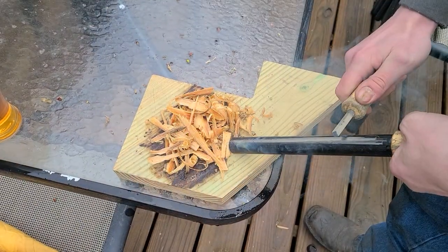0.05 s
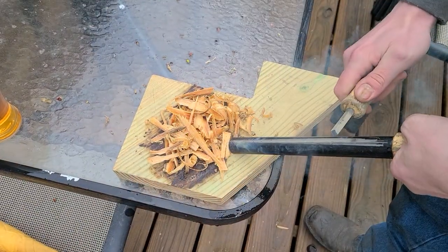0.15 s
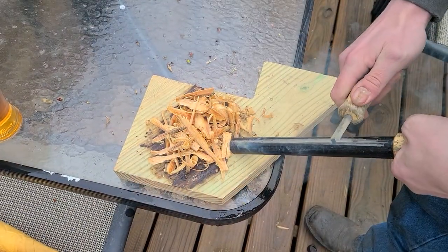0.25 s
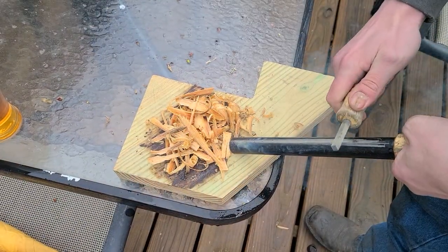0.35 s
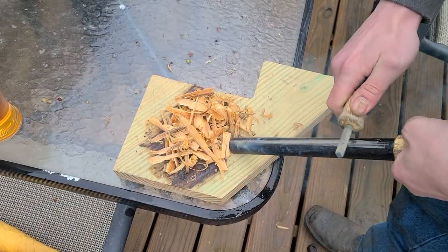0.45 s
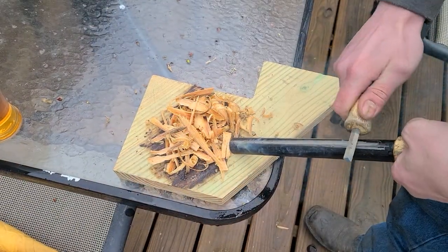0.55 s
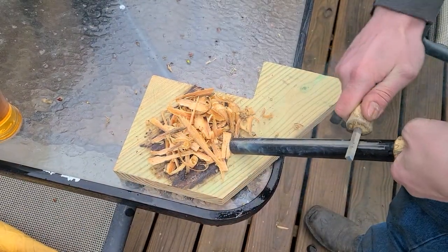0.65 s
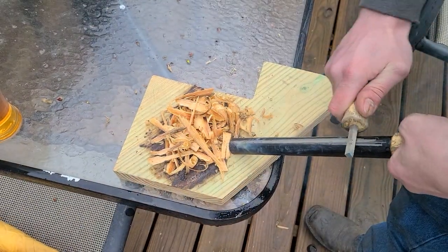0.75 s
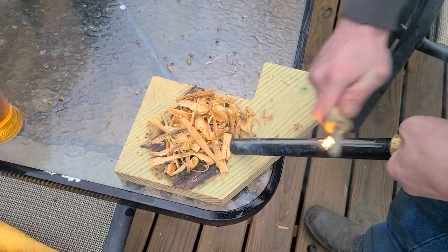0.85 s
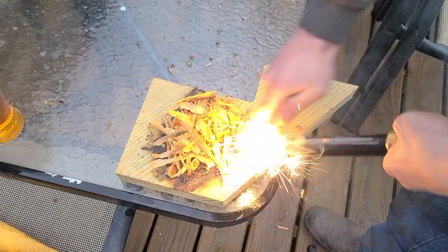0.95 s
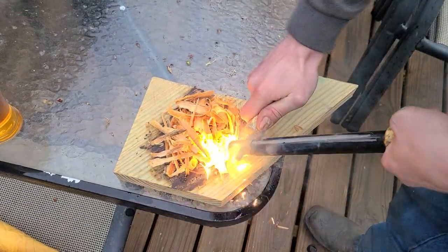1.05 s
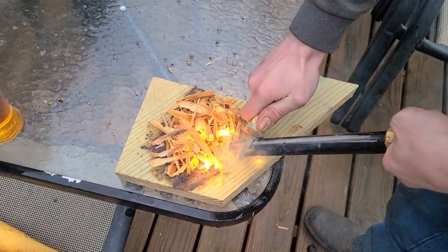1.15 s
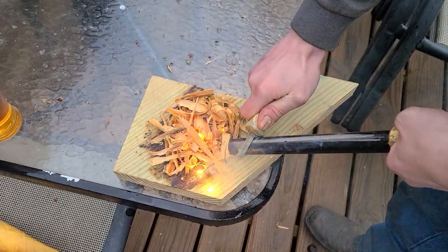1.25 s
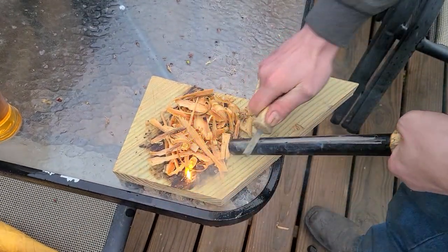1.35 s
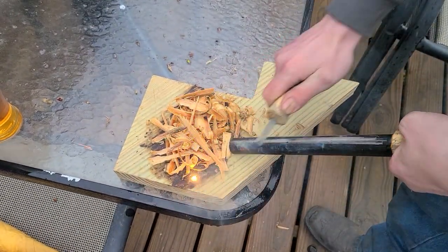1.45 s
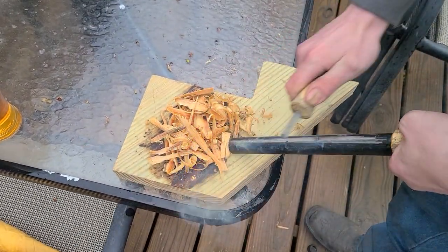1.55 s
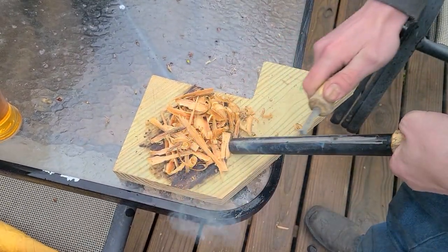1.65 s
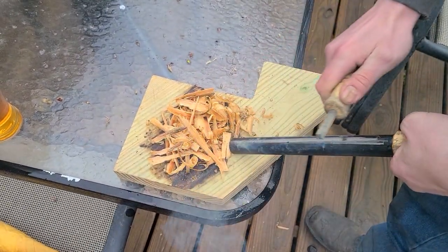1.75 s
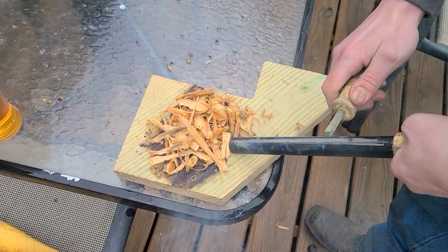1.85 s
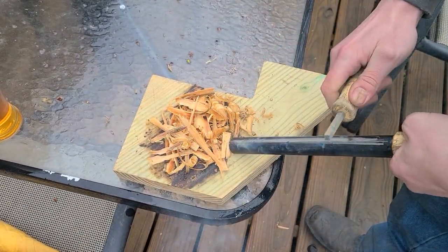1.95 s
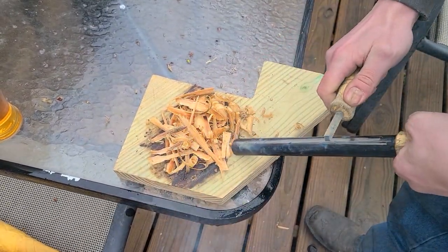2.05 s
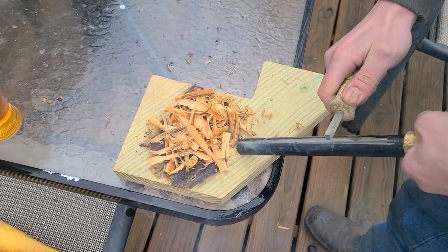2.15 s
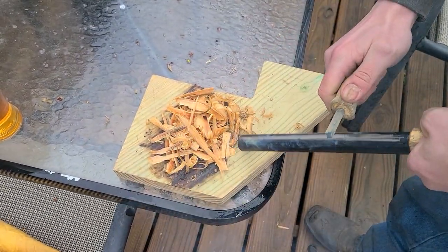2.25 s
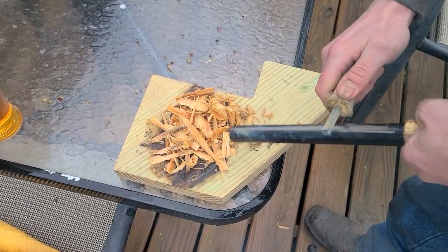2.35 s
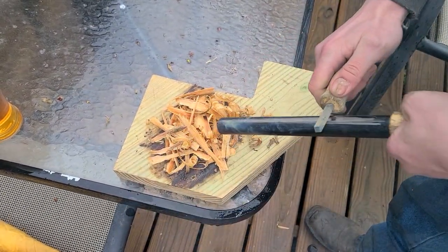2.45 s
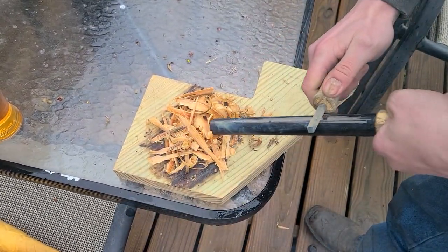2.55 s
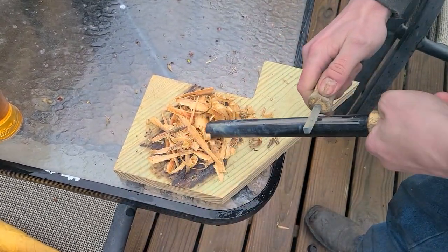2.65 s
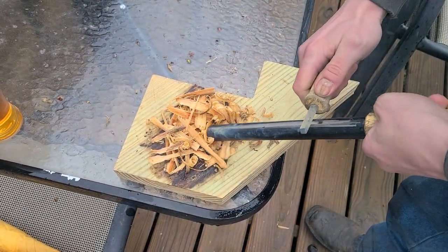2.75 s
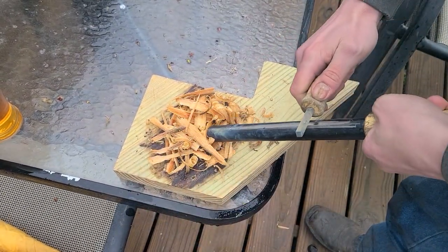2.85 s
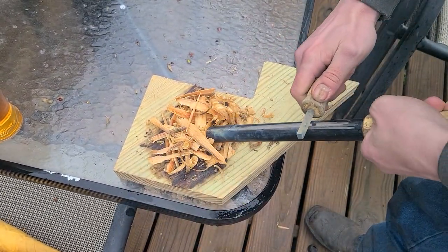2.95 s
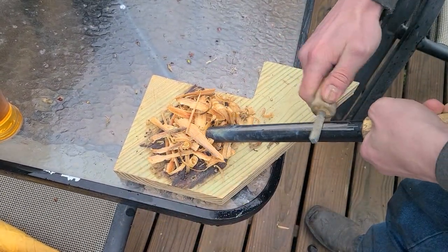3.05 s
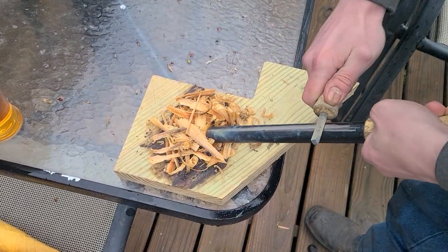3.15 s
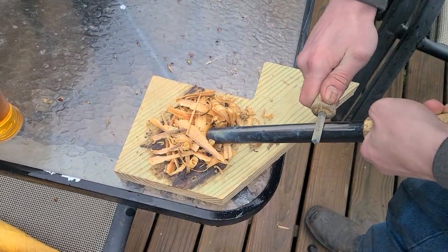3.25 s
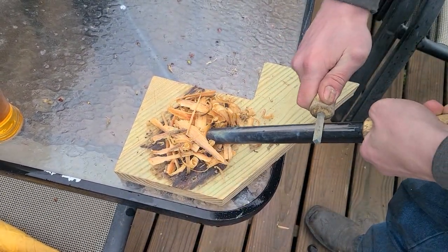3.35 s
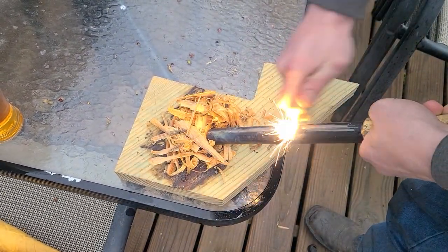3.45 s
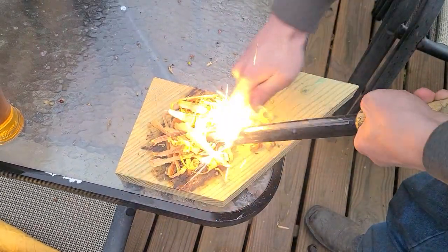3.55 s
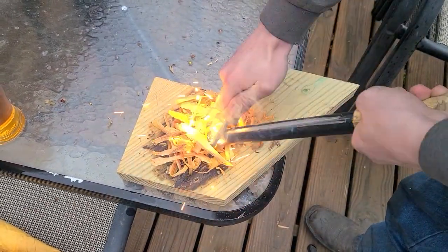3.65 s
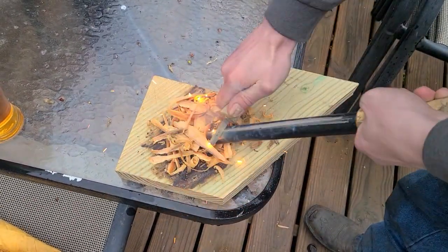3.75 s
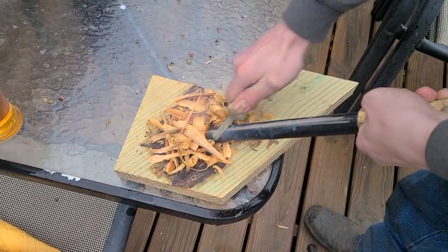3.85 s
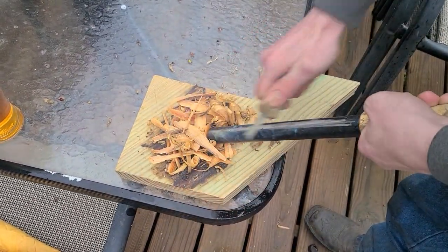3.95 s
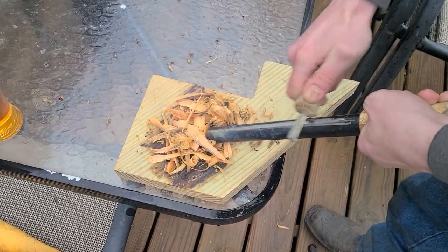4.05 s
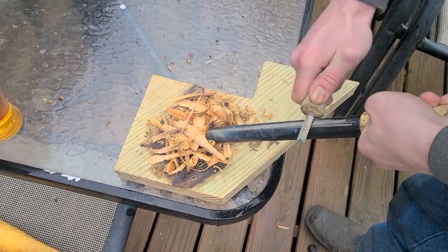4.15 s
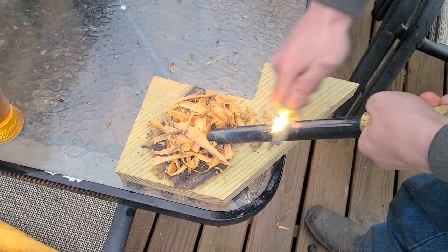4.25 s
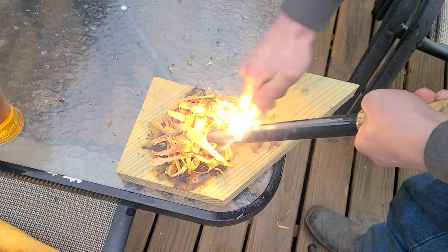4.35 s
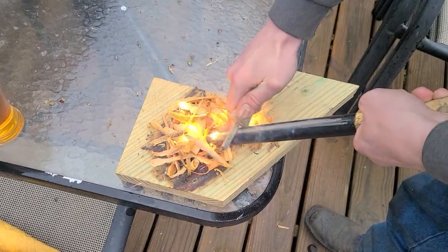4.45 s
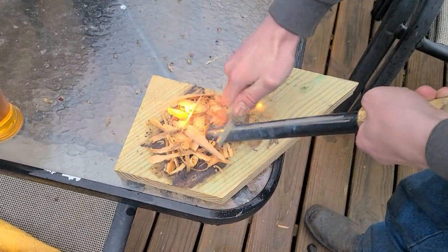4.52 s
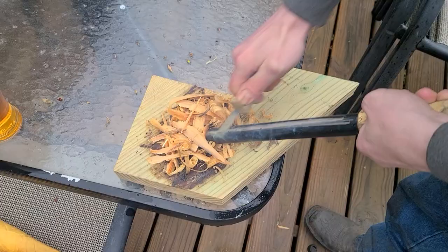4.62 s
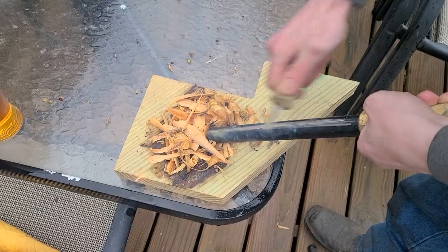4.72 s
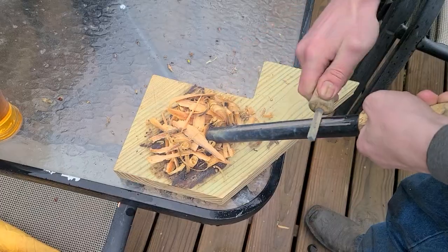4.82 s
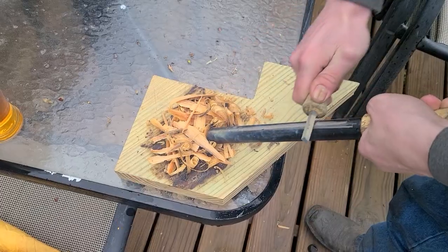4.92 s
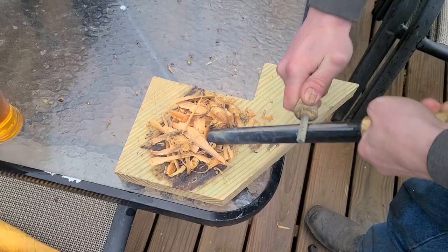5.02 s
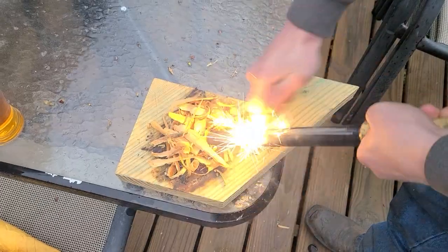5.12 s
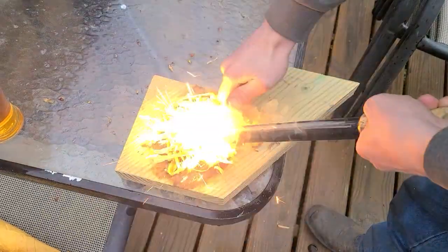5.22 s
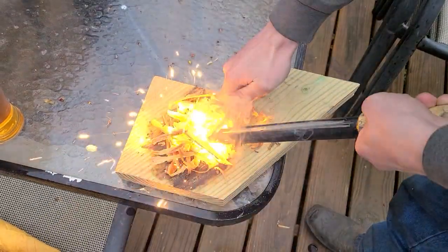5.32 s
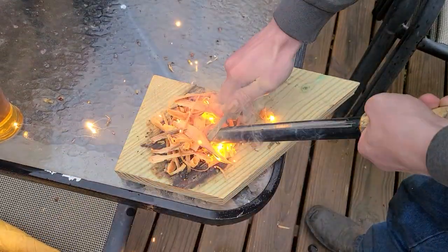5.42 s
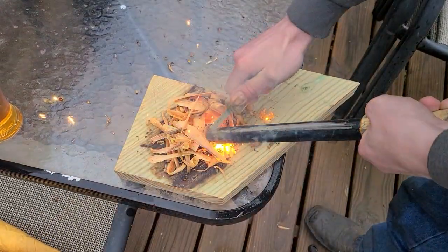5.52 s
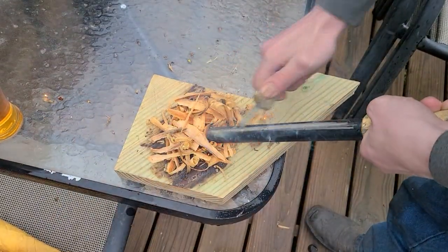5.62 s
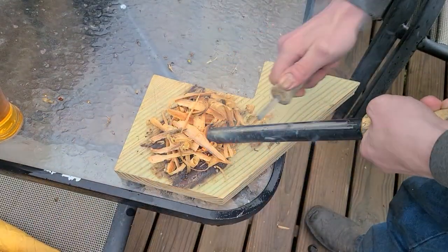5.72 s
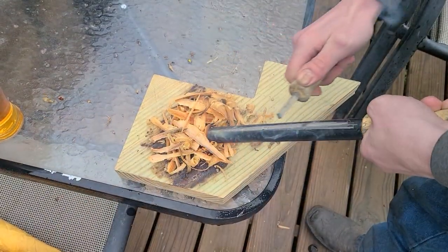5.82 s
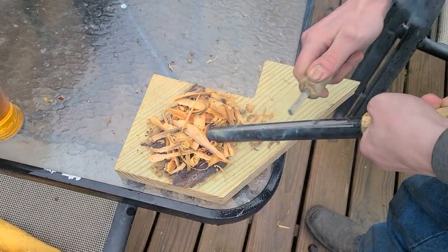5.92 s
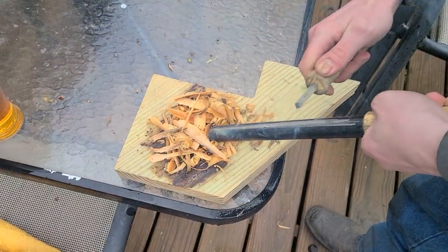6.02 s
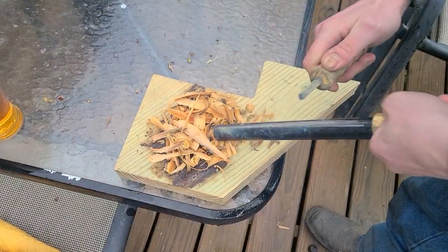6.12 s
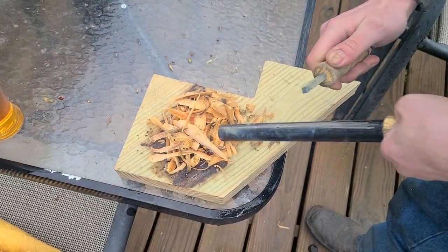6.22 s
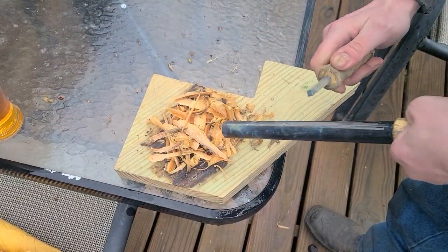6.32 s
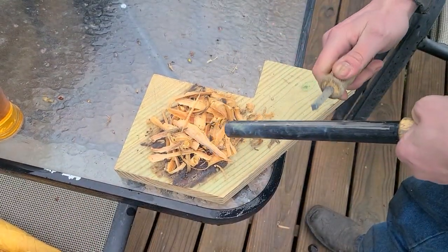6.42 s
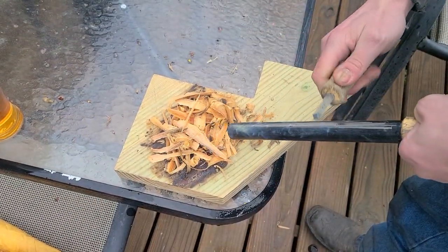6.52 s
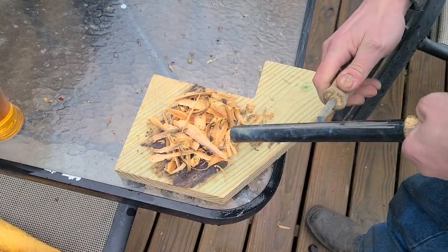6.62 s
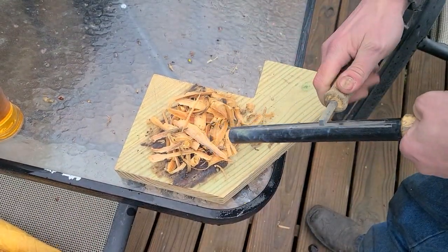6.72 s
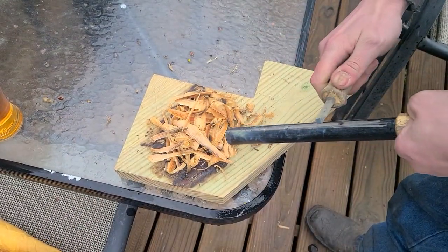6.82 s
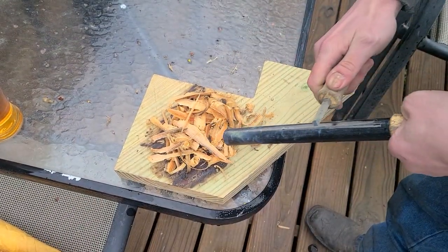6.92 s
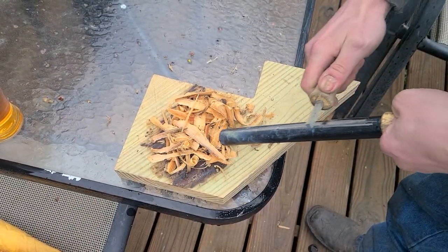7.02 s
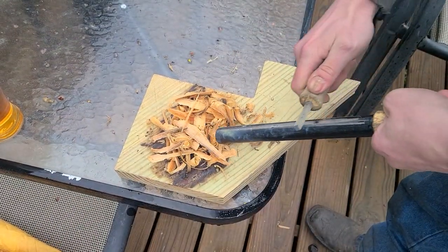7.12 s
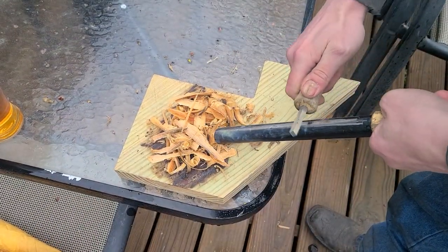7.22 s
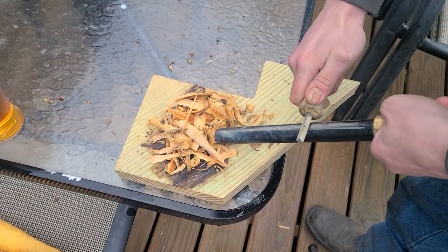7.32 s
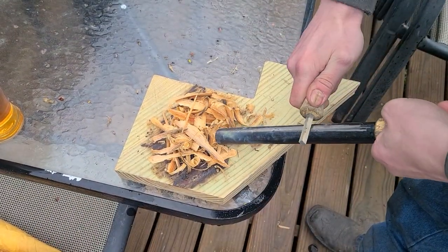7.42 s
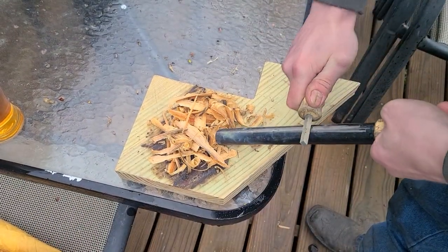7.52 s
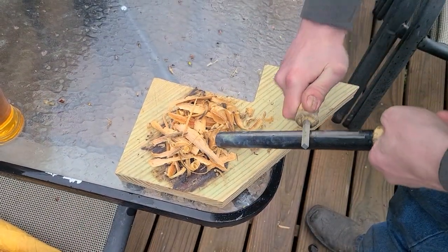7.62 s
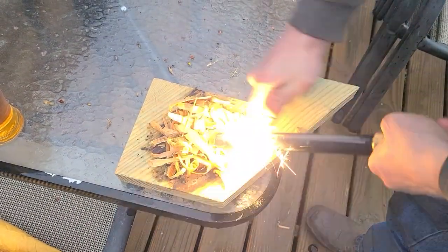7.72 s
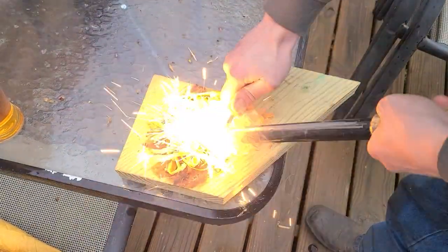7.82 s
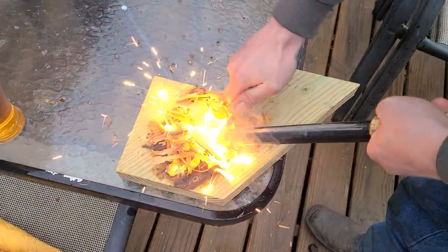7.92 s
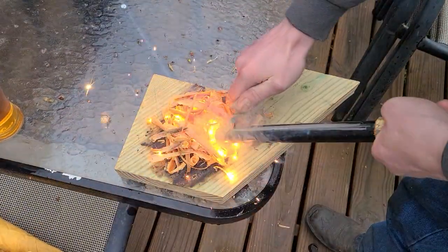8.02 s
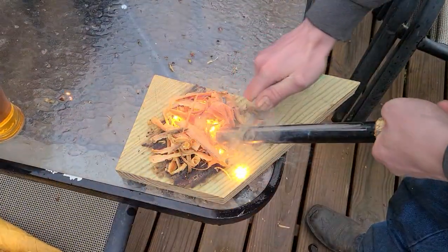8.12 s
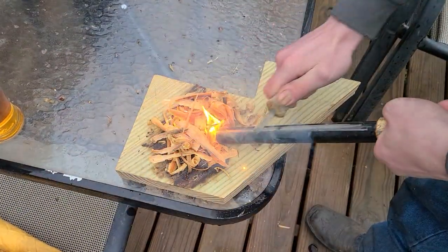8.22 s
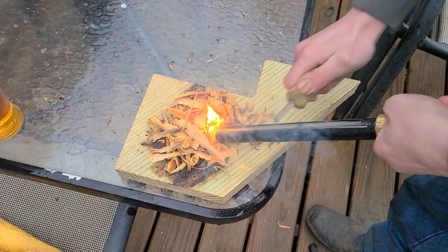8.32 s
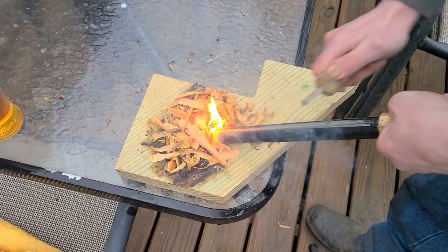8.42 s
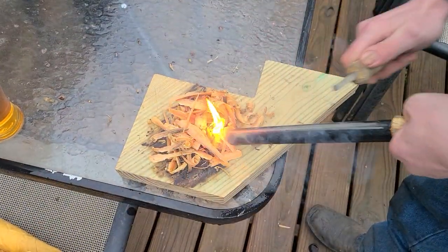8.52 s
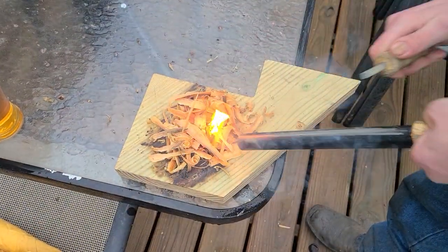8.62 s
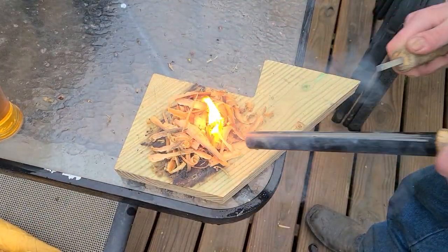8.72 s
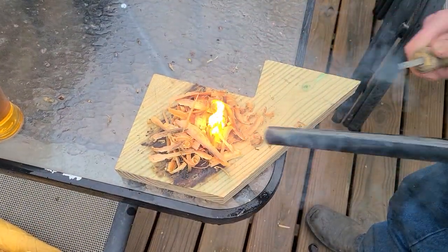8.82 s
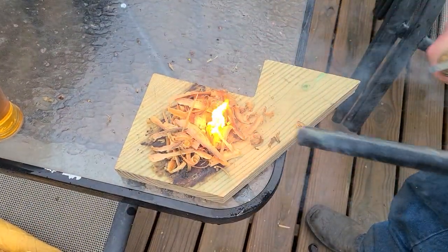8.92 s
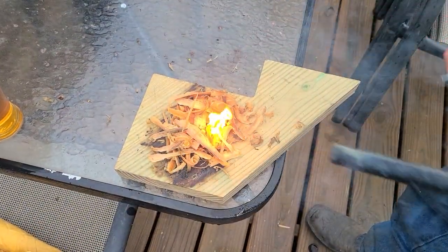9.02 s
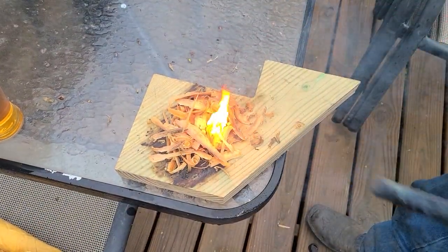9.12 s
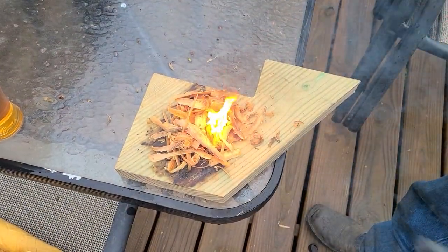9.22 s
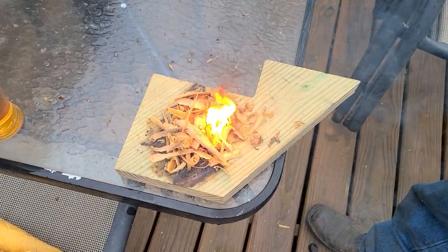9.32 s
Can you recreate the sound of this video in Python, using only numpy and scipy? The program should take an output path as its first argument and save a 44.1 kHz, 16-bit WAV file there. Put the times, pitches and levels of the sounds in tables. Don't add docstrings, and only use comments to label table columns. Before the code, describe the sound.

Outdoors, a songbird already under way repeats sharp chips and a falling, levelling whistle until about 0.9 s, with long echoes off houses. Low traffic rumble, tyre wash, a wavering far engine and a faint fan hum lie behind throughout. Close and mostly right, a light metal touch at 0.6 s leads to a harsh gritty rasp at 0.9-1.2 s, ending in woody knocks. A hard ringing tap comes at 3.2 s, a fast scrape at 3.5-3.7, the loudest tap at 4.2, a short scrape at 4.3-4.5, another tap at 4.9 and the hardest scrape at 5.15-5.4. Between them are small rustles, slips and dry spark spits. The bird returns from 5.9 to about 8.1 s. After a clear tap at 7.4, the last scrape tears at 7.8-8.0, juddering on the board. Then very faint fire ticks and soft wooden bumps end it near 9.3 s.

```python
import sys
import numpy as np
from scipy import signal
from scipy.fft import rfft, irfft, next_fast_len
from scipy.io import wavfile
from scipy.ndimage import uniform_filter1d, map_coordinates

SR = 44100
rng = np.random.default_rng(int(sys.argv[2]) if len(sys.argv) > 2 else 0)


def generate_wav(sig):
    pcm = np.round(np.clip(np.atleast_2d(sig).T, -1, 1) * 32767).astype(np.int16)
    wavfile.write(sys.argv[1], SR, pcm)


def gain_from_db(level_db):
    decades = np.asarray(level_db, float) / 20
    return 10 ** decades


N = 413216

# (time [s], speed [dB], pressure on the board [dB])
STROKES = [
    [(0.91, -78, 10), (0.932, -50.5, -5), (0.984, -38.5, -1.5), (1.06, -32.5, -3.5), (1.13, -44.5, 2),
     (1.17, -58, 25.5), (1.27, -73, 27.5)],
    [(3.5, -86, 11), (3.528, -50.5, 2), (3.56, -37.5, -4.5), (3.662, -34.5, -11), (3.684, -38, 1.5),
     (3.725, -41.5, -4), (3.79, -75.5, 28)],
    [(4.3, -71, 5), (4.35, -38.5, -6.5), (4.44, -40.5, -6), (4.474, -39, -5), (4.52, -45, 1.5),
     (4.55, -69, 17.5), (4.57, -56, 17)],
    [(5.14, -84, 8), (5.168, -37.5, -2.5), (5.25, -33.5, -3), (5.278, -26.5, -4), (5.33, -40.5, 6),
     (5.385, -58, 6.5), (5.43, -60, 14)],
    [(7.77, -55.5, -19), (7.792, -39, 7), (7.826, -28.5, -0.5), (7.878, -30.5, 8), (7.922, -44, 2.5),
     (7.95, -44.5, 1.5), (7.99, -60.5, 6)],
]
# (peak time [s], level [dB], rise [dB/s], fall [dB/s])
SHOVES = [
    (1.085, -38, 400, 402),
    (3.678, -30, 900, 500),
    (3.712, -29, 300, 400),
    (4.5, -33.5, 400, 404),
    (5.285, -28, 142, 601),
    (7.87, -37, 206, 503),
]
# (frequency [Hz], level [dB per Hz])
GRIT_COLOUR = [(2940, -27.5), (5000, -6), (6590, 0.5), (8020, -7), (9380, -16), (11100, -10), (13300, -8),
               (15200, -17)]
# (frequency [Hz], width [Hz], level [dB])
BLADE_MODES = [(3130, 2050, 2.5), (4660, 360, 4), (4860, 260, -10), (5860, 160, 4.5)]
ROD_MODES = [(720, 72, -2.5), (1280, 500, -2.5), (1667, 130, 0), (1860, 156, -4), (2790, 370, -12.5)]
BOARD_MODES = [(168.2, 28, 7.5), (225, 250, -3.5), (381, 86, 2), (440, 107, -3.5)]
# (frequency [Hz], left-right likeness [-1..1])
NEAR_ALIKE = [(60, 0.95), (180, 0.91), (550, 0.3), (1650, 0.64), (4970, 0.13), (15000, -0.063)]
# (frequency [Hz], left over right [dB])
NEAR_PAN = [(60, 2), (150, 3.5), (380, -25), (950, 7.5), (2380, -8), (5980, -8), (15000, -9.5)]


def strokes():
    speed, pressure = levels(STROKES)
    gone, edge_s = travel(), 0.0077
    speed = speed * np.clip(np.minimum(gone, 1 - gone) * 0.7 / edge_s, 0, 1)
    grit = gain_from_db(-0.5) * speed
    blade = gain_from_db(-1) * speed * pressure ** 0.29
    rod = gain_from_db(-2.5) * speed * pressure ** 0.7
    board = gain_from_db(-0.5) * speed * pressure
    bite = gain_from_db(0.7 * wobble(30) + 1.2 * wobble(180))

    def near(pair, response):
        uneven = patched(pair, depth_db=1.5, bins=3, frames=12)
        return bite * stereo(uneven, response, NEAR_ALIKE, NEAR_PAN)

    def darker(table):
        ring = modes(table)
        return lambda hz: ring(hz) * np.abs(ring(hz)) ** 0.1

    slips = np.diff(np.floor(np.cumsum(125 * gain_from_db(2.5 * wobble(25)) / SR)), prepend=0)
    judder = slips * gain_from_db(2.3 * rng.standard_normal(N)) + 0.055 * rng.standard_normal((2, N))
    board_alike, board_pan = [(150, 1.0), (600, 0.81)], [(150, -1.26), (500, -5.0)]

    sound = grit * near(grains(9000, spread_db=1.5), colour(GRIT_COLOUR))
    sound += blade * near(grains(4000, spread_db=0.0), darker(BLADE_MODES))
    sound += rod * near(grains(3000, spread_db=1.0), darker(ROD_MODES))
    sound += board * bite * stereo(judder, darker(BOARD_MODES[1:]), board_alike, board_pan)
    shove_hz = BOARD_MODES[0][0] * gain_from_db(0.34 + 0.6 * wobble(30))
    hum = np.sqrt(2) * np.sin(2 * np.pi * np.cumsum(shove_hz) / SR)
    return sound + swells(SHOVES) * bite * hum


def travel():
    t = np.arange(N) / SR
    return sum(np.interp(t, [rows[0][0], rows[-1][0]], [0, 1], 0, 0) for rows in STROKES)


# (middle time [s], length [s], frequency [Hz], level [dB])
CATCHES = [(0.957, 0.063, 5980, -56), (0.994, 0.042, 375, -33), (1.167, 0.025, 273, -28.5),
           (1.087, .025, 280, -34), (0.971, 0.041, 410, -43), (1.06, .05, 440, -35.5),
           (1.091, .04, 440, -33), (1.016, 0.024, 1860, -33.5), (1.028, 0.044, 473, -33.5),
           (1.035, .06, 4210, -41), (1.042, 0.076, 6200, -37), (1.072, 0.028, 1050, -35),
           (1.069, 0.022, 1490, -34), (1.112, 0.019, 3180, -40), (1.115, 0.015, 1010, -37.5),
           (1.134, 0.011, 1750, -34), (1.134, 0.0085, 3000, -39.5), (1.199, 0.0075, 6000, -38.5),
           (1.193, 0.0044, 3940, -37), (3.533, 0.028, 5750, -49), (3.56, 0.058, 3130, -46),
           (3.576, 0.013, 2120, -38), (3.593, 0.078, 373, -41.5), (3.597, .09, 4300, -41.5),
           (3.655, .015, 1790, -35.5), (3.663, 0.036, 3770, -33), (3.66, .03, 6000, -42),
           (3.715, .04, 4270, -38), (3.73, 0.058, 3600, -44), (4.337, 0.038, 2600, -44),
           (4.337, .02, 1880, -43), (4.36, 0.025, 7000, -33.5), (4.369, .025, 2700, -39),
           (4.37, 0.033, 1350, -47), (4.404, 0.084, 4200, -48), (4.475, 0.021, 3670, -40),
           (4.493, 0.054, 2680, -39), (4.61, .03, 7100, -48), (5.175, 0.029, 378, -32.5),
           (5.18, 0.031, 6050, -40), (5.218, 0.032, 255, -37), (5.265, 0.021, 2400, -37),
           (5.268, 0.028, 3830, -39), (5.278, 0.03, 6700, -30), (5.281, 0.039, 1130, -31.5),
           (5.305, 0.047, 1510, -37), (5.313, 0.043, 3420, -36.5), (7.823, 0.036, 1110, -37),
           (7.832, 0.023, 3100, -36), (7.856, 0.024, 1180, -25), (7.86, 0.023, 2620, -35),
           (7.866, 0.059, 6650, -39), (7.9, 0.047, 1340, -31), (7.892, .03, 3400, -37)]


def catches():
    out = np.zeros((2, N))
    for s, length, hz, db in CATCHES:
        size = round(2 * length * SR)
        grid = np.fft.rfftfreq(size, 1 / SR)
        shower = rng.standard_normal((3, 8000))[:, :size]
        pair = shower[0] + np.clip(hz / 6000, 0, 1) * shower[1:]
        width_hz = 60 + 0.12 * hz
        sung = irfft(rfft(pair) * modes([(hz, width_hz, 0)])(grid) ** 2, size)
        burst = gain_from_db(db) * unit(sung) * np.hanning(size) ** 2
        add(out, s - length, burst, along(NEAR_PAN, hz) * (hz > 900))
    return out


# (time [s], peak level [dB], low ring [dB], ringing [dB], left over right [dB])
TAPS = [
    (0.6331, -22.5, 8.5, 0, -6),
    (3.1737, -6, -4, -9.5, -7),
    (4.2264, -2.5, -3, -7, -4.5),
    (4.928, -6.5, -8, -5.5, -0.5),
    (7.384, -9.5, -7, -5.5, -8.5),
]
# (frequency [Hz], width [Hz], level [dB])
RINGS = [
    [(1030, 97, -1.5), (1918, 74, -6), (2630, 160, -15), (4220, 140, 2), (5770, 81, -9), (7400, 120, -29)],
    [(1450, 22, -18), (2120, 15, 1.5), (2680, 21, 1.5), (2750, 35, 0), (3100, 24, -20), (3380, 27, -18),
     (4430, 15, 1), (5370, 85, -4), (5970, 26, -4), (6320, 57, -7)],
    [(1357, 15, -28), (1810, 10, -13), (2130, 80, -9), (2450, 29, -4), (3140, 20, -1), (4500, 27, 0),
     (4945, 26, -4), (5760, 67, 0.5), (5880, 15, -4.5), (7260, 39, -23.5)],
    [(1460, 20, -13.5), (2320, 21.6, 5.5), (2700, 24, -14), (3900, 27.4, -17), (4600, 19, 3),
     (4530, 21, -9), (4900, 28, 1), (5330, 65, -4), (5780, 21, 7), (7100, 28, -19)],
    [(2210, 34, 1), (2830, 46, 4), (4240, 38, -4.5), (4600, 16, -17), (4840, 78, -22), (5640, 26, -1),
     (5810, 23, -6), (6990, 23, -19.5), (7560, 60, -8.5)],
]
# (frequency [Hz], width [Hz], level [dB])
CONTACT = [(764, 380, -10), (1300, 580, -2.5), (2400, 630, 2.5), (4430, 340, 1), (5590, 530, 1.5),
           (7150, 1800, -14), (10310, 950, 5.5), (14000, 2700, -11)]
# (delay [s], level [dB])
REBOUNDS = [
    (.0062, -17),
    (0.0153, -19.5),
]


def taps():
    out = np.zeros((2, N))
    t = np.arange(SR // 5) / SR - 0.015
    hit, grid = np.argmax(t >= 0), np.fft.rfftfreq(len(t), 1 / SR)
    ports = 1 - 1.0 * np.exp(-((grid - 8800) / 700) ** 2)
    ports = ports * (1j * grid / (620 + 1j * grid)) ** 2
    slide = gain_from_db(-32.5 + 60 * t / 0.036)
    scuff = gain_from_db(-18.5 - 60 * t / 0.0076) + gain_from_db(-27.5 - 60 * t / 0.047)
    grip_hz, snap_db = 95, -24.5

    def through(x, table):
        return irfft(rfft(x) * modes(table)(grid) * ports, len(t))

    for (s, db, low_db, ring_db, pan_db), steel in zip(TAPS, RINGS):
        force = rng.standard_normal((2, len(t))) * np.where(t < 0, slide, scuff)
        force[[0, 1], [hit + 2, hit]] = 1
        for late, rebound_db in REBOUNDS:
            force[:, hit + round(late * SR)] = gain_from_db(rebound_db)
        struck = []
        for hz, width, level in CONTACT:
            hz = hz * (1 + 0.021 * rng.normal())
            tilt_db = (hz < 3300) * (low_db + 2.0) + (hz > 8500) * snap_db
            struck.append((hz, width, level + tilt_db))
        blow = through(force, struck)
        chatter = (t > 0) * gain_from_db(-60 * t / 0.12) * rng.standard_normal((2, len(t)))
        chatter[[0, 1], [hit + 2, hit]] = 22
        ring = through(chatter, [(hz, grip_hz + width, level) for hz, width, level in steel])
        both = blow / np.abs(blow.mean(axis=0)).max() + gain_from_db(ring_db) * ring
        add(out, s + 0.001106 + t[0], gain_from_db(db + 1) * both, pan_db)
    return out


# (peak time [s], level [dB], rise [dB/s], fall [dB/s])
RUSTLE = [(0.015, -63, 100, 399), (1.28, -69.5, 398, 40), (1.524, -62, 900, 220), (2.884, -66, 118, 350),
          (3.182, -65, 198, 71), (5.076, -64, 201, 332), (5.44, -62, 400, 60), (5.754, -60, 424, 261),
          (7.148, -61, 160, 338), (7.242, -64.5, 381, 136), (7.696, -71, 220, 88), (7.975, -54.5, 201, 118),
          (8.1, -66, 400, 33), (4.608, -57.5, 1500, 200), (9.194, -73, 897, 700), (9.37, -71, 60, 100),
          (8.55, -71.5, 60, 56), (3.3, -75, 200, 200)]


def rustle():
    soft = [(1500, -13.0), (3500, -1), (5000, -13), (7000, -6.5), (9000, -22.5), (12500, -15.0), (16000, -26.5)]
    rubbing = stereo(grains(4000, spread_db=1.8), colour(soft), NEAR_ALIKE, NEAR_PAN)
    return swells(RUSTLE) * gain_from_db(8.0 + 4.6 * wobble(40)) * rubbing


# (time [s], peak level [dB])
SPITS = [(1.2516, -42), (1.324, -45), (1.3548, -47.5), (1.4277, -48), (2.4944, -45.5), (2.8554, -42.5),
         (2.8774, -44), (3.027, -48.5), (3.251, -54), (3.2964, -41), (3.3104, -46), (3.3294, -43.5),
         (3.8477, -50), (5.3852, -39.5), (5.472, -57), (5.5129, -46), (5.5564, -45.5), (7.112, -40),
         (7.143, -41.5), (7.2335, -49.5), (9.195, -51)]
# (time [s], peak level [dB])
SLIPS = [(0.5556, -53.5), (0.5701, -56), (0.581, -47), (0.614, -50), (1.1958, -31), (1.303, -56),
         (1.5268, -42), (2.7397, -49.5), (2.9906, -44.5), (3.107, -28.5), (4.354, -24), (5.7169, -66),
         (5.7558, -48), (7.2898, -54), (7.704, -43), (8.1594, -49), (8.1844, -46), (7.9992, -40),
         (8.2407, -54), (8.2496, -57), (9.3356, -48)]
# (time [s], peak level [dB])
CRACKLE = [(8.5102, -52), (8.5326, -53), (8.5561, -53), (8.614, -50), (8.6798, -56), (8.7072, -57),
           (8.8743, -55), (8.9193, -49), (8.9672, -49), (8.9856, -53), (9.048, -50), (9.0689, -52),
           (9.1004, -57), (9.1507, -54), (9.1812, -55), (9.2131, -51)]


def ticks():
    bright, dull = np.zeros((2, N)), np.zeros((2, N))
    t = np.arange(800) / SR
    shape = gain_from_db(-60 * t / 0.0029) + 0.2 * gain_from_db(-60 * t / 0.045) * np.hanning(1600)[800:]
    quieter_crackle = np.subtract(CRACKLE, [0, 13])
    for rows, dull_db in ((SPITS, -6.5), (SLIPS, 0.5), (quieter_crackle, 7)):
        for s, db in rows:
            spit = shape * (rng.standard_normal(800) + 3.2 * rng.standard_normal((2, 800)))
            add(bright, s, gain_from_db(db - 5.5) * spit, pan_db=-11.0)
            add(dull, s, gain_from_db(db + dull_db) * spit, pan_db=-9.5)
    high = modes([(10300, 3400, -0.89), (12240, 3000, 1.5)])
    low = modes([(2600, 2700, -9.0), (6780, 960, 5)])
    return filtered(bright, high) + filtered(dull, low)


# (time [s], peak level [dB], hard part [dB])
KNOCKS = [(1.132, -39, 9.5), (5.165, -26, -25), (7.788, -23.5, -12), (1.155, -8, -17.5),
          (1.545, -22.5, -21), (4.582, -19, -26), (7.688, -25, -31), (7.701, -44, 2.5), (8.615, -28, -23),
          (8.902, -29.5, -25), (8.917, -36, -10), (9.195, -25, -28), (1.187, -27, -23)]


def knocks():
    low, hard = np.zeros(N), np.zeros(N)
    bounces = [(0, -2.5), (0.0045, -1.5), (0.013, 0.5), (0.021, -5), (0.033, -13)]  # (delay [s], level [dB])
    decay_db = -60 * np.arange(400) / SR / 0.0073
    for s, db, hard_db in KNOCKS:
        for late, bounce_db in bounces:
            low[round((s + 0.002 + late) * SR)] += gain_from_db(db + 30.0 + bounce_db)
        click = gain_from_db(db + hard_db + 28.5 + decay_db) * rng.standard_normal(400)
        hard[round(s * SR):][:400] += click
    thud = filtered(low, lambda hz: modes(BOARD_MODES)(hz) / (1 + 1j * hz / 900) ** 2)
    return thud + filtered(hard, lambda hz: modes(ROD_MODES[1:4])(hz) ** 2)


# (time from its start [s], frequency [Hz], level [dB])
CHIPS = [
    [(.011, 7100, -73), (.017, 6050, -43), (.022, 5460, -41.5), (.029, 5100, -49.5), (.033, 5200, -47),
     (.038, 5300, -58)],
    [(.039, 3880, -58.5), (.045, 4040, -31.5), (.05, 4230, -44), (.054, 4220, -28), (.059, 4600, -47.5),
     (.063, 4770, -41), (.07, 4900, -46.5)],
    [(.094, 2570, -38), (.105, 2520, -34.5), (.111, 2330, -42.5), (.119, 1940, -34), (.128, 1886, -52),
     (.136, 1735, -40), (.146, 1660, -49.5)],
]
# (time from its start [s], frequency [Hz], level [dB])
WHISTLE = [
    [(.005, 3990, -57), (.024, 3790, -36), (.031, 3680, -28), (.039, 3610, -32), (.045, 3570, -29),
     (.05, 3440, -35), (.053, 3360, -33), (.059, 3230, -46.5)],
    [(.061, 3070, -43), (.07, 3020, -32.5), (.085, 2960, -26.5), (.108, 2900, -29.5), (.122, 2900, -27.5),
     (.133, 2880, -30.5), (.143, 2875, -42)],
]
# (time [s], level [dB], pitch ratio, fade [dB/s])
CHIPS_AT = [
    (-.215, 15.5, 0.9, 1),
    (0.159, 0.5, 1, 2),
    (.54, 0, 1, -1),
    (5.904, -4.5, 0.99, 0),
    (6.273, 0.5, 1, 3),
    (6.639, 0.5, 1, 2),
    (7.006, 1.5, 1, 0.5),
    (7.373, 2, 1, 0),
    (7.754, 0, 1, 0),
]
WHISTLE_AT = [
    (-.021, 1, 0.99, 10),
    (0.344, 0.9, 1, 12.5),
    (0.73, 0, 0.99, 28),
    (6.095, -2.5, 1.003, 1),
    (6.461, -0.5, 0.99, 3),
    (6.827, 0.1, 0.99, 15),
    (7.192, 1, .992, 28),
    (7.559, 1, 1, 32),
    (7.947, 0, 1, 17),
]
# (frequency [Hz], 60 dB decay time [s])
YARD = [(1500, 0.3), (3000, 0.73), (3700, 0.73), (5000, 0.68), (8000, 0.72)]


def bird():
    lead = SR // 4
    song = np.zeros((2, N + lead))
    for notes, starts in ((CHIPS, CHIPS_AT), (WHISTLE, WHISTLE_AT)):
        for s, db, ratio, fade_db in starts:
            for note in notes:
                u, hz, level = np.transpose(note)
                t = np.arange(u[0], u[-1], 1 / SR)
                turn = 2 * np.pi * np.cumsum(np.interp(t, u, hz) * ratio) / SR
                strength_db = db + rng.normal(0, 0.6)
                shape = gain_from_db(strength_db + np.interp(t, u, level) - fade_db * (t - t.mean()))
                shape = shape * signal.windows.tukey(len(t), 0.12)
                voice = shape * (np.sin(turn) + gain_from_db(-45) * np.sin(2 * turn))
                add(song, s + u[0] + lead / SR, voice[None], 0)
    hz, t, z = signal.stft(rng.standard_normal((2, SR)), SR, nperseg=256)
    tail = signal.istft(z * gain_from_db(-60 * t / along(YARD, hz)[:, None]), SR, nperseg=256)[1]
    tail = filtered(tail, lambda f: (f > 1400) * (f < 8000))[:, :SR]
    late_song = np.pad(song[:1], ((0, 0), (900, 0)))
    echo = signal.fftconvolve(late_song, tail / np.linalg.norm(tail[0]), axes=1)
    near = np.zeros((2, SR // 25))
    arrivals = rng.integers(20, SR // 40, 12) + rng.integers(0, 3, (2, 12))
    near[[[0], [1]], arrivals] = gain_from_db(-22) * rng.standard_normal(12)
    near[:, 0] = gain_from_db([-0.5, 0.5])
    direct = signal.fftconvolve(song, near, axes=1)[:, lead:N + lead]
    return direct + gain_from_db(-12.0 + 1.0 * wobble(30)) * echo[:, lead:N + lead]


# (time [s], flow [dB], brightness [dB])
TRAFFIC = [(0.0, -51, -2.5), (1.3, -49, -1.5), (2.2, -48.5, -0.5), (3.3, -50.5, 1), (4.3, -51, 1.5),
           (5.2, -51, -1.5), (6.4, -54, 0), (7.62, -53.5, -2.5), (7.86, -49.5, -1), (8.2, -51.5, -3.5),
           (8.7, -53.5, -4.5), (9.37, -52.5, -3.5)]
# (frequency [Hz], level [dB per Hz])
RUMBLE_COLOUR = [(12, -53.5), (20, -16.5), (54, -3), (70, 1), (150, -11.5), (211, -16), (300, -23),
                 (660, -120)]
TYRE_COLOUR = [(120, -27), (178, -3), (270, -10), (370, -6), (560, -9.5), (1190, -6.5), (2010, -12),
               (3200, -19), (6000, -34.5), (7800, -64)]
# (frequency [Hz], level [dB per Hz])
HISS_COLOUR = [(2650, -37.5), (4500, -24.5), (5720, -14.5), (7050, -6), (8170, -20), (9070, -25.5),
               (12400, -16.5), (15700, -25)]
# (frequency [Hz], left-right likeness [-1..1])
FAR_ALIKE = [(60, 0.98), (180, 0.99), (550, 0.53), (1650, -0.092), (4970, -0.066), (15000, 0.19)]
# (time [s], frequency [Hz], level [dB])
ENGINE = [(0.0, 73.7, -58), (0.3, 73.3, -60), (0.6, 73, -42), (2.2, 70, -36), (2.3, 69.5, -54),
          (2.744, 71.7, -38.5), (3.05, 64.9, -59), (3.2, 73, -57), (5.59, 67.73, -48.5), (8.25, 76.8, -64),
          (9.37, 66.3, -51)]
# (time [s], level [dB])
FAN = [
    (0.0, -53),
    (1.07, -49.5),
    (3.16, -63),
    (3.68, -51.5),
    (5.5, -49.5),
    (9.37, -47.5),
]


def town():
    flow, bright = levels([TRAFFIC])
    patchy = patched(rng.standard_normal((2, N)), depth_db=1.5, bins=3, frames=30)
    drift_db = 0.5 * wobble(2)
    tyres = stereo(patchy, colour(TYRE_COLOUR), FAR_ALIKE, [(100, -0.29)])
    swish = filtered(tyres, lambda hz: 1 / (1 + (1700 / (hz + 1)) ** 4))
    rumble = stereo(rng.standard_normal((2, N)), colour(RUMBLE_COLOUR), FAR_ALIKE, [(100, -0.73)])
    leaves = patched(rng.standard_normal((2, N)), depth_db=1.0, bins=5, frames=20)
    hiss = stereo(leaves, colour(HISS_COLOUR), [(100, 0.02)], [(100, 0.2)])
    sound = flow * gain_from_db(3.5 + drift_db) * (tyres + (bright - 1) * swish)
    sound += flow * gain_from_db(5 + 2 * drift_db) * rumble
    sound += gain_from_db(-71.5 + 2.0 * wobble(0.78)) * hiss

    s, hz, db = np.transpose(ENGINE)
    t = np.arange(N) / SR
    throb_db = 1.5 * wobble(6)
    engine_hz = np.interp(t, s, hz) + 1.44 * wobble(11)
    engine = gain_from_db(np.interp(t, s, db) + throb_db) * np.sin(2 * np.pi * np.cumsum(engine_hz) / SR)
    fan_turn = 2 * np.pi * np.cumsum(184.4 + 0.42 * wobble(5.5)) / SR
    fan = levels([FAN])[0] * gain_from_db(1.3 * wobble(4.2)) * np.sin(fan_turn)
    return sound + engine + fan


def unit(x):
    return x / np.sqrt(np.mean(x ** 2) + 1e-20)


def along(points, hz):
    f, v = np.transpose(points)
    return np.interp(np.log(hz + 1), np.log(f + 1), v)


def levels(tables):
    t = np.arange(N) / SR
    each = []
    for rows in tables:
        s, *columns = np.transpose(rows)
        each.append([np.interp(t, s, db, -200, -200) for db in columns])
    return gain_from_db(np.max(each, axis=0))


def swells(rows):
    t = np.arange(N) / SR
    each = [db - np.maximum(rise * (s - t), fall * (t - s)) for s, db, rise, fall in rows]
    return gain_from_db(np.max(each, axis=0))


def wobble(rate):
    return map_coordinates(rng.standard_normal(int(N * rate / SR) + 4), [np.arange(N) * rate / SR])


def grains(rate, spread_db):
    hit = rng.random((2, N)) < rate / SR
    size_db = spread_db * np.minimum(rng.exponential(size=(2, N)), 3.5)
    return hit * rng.standard_normal((2, N)) * gain_from_db(size_db)


def patched(pair, depth_db, bins, frames):
    z = signal.stft(pair, nperseg=256)[2]
    field = uniform_filter1d(rng.standard_normal(z.shape[1:]), bins, 0)
    field = uniform_filter1d(field, frames, 1)
    return signal.istft(z * gain_from_db(depth_db * unit(field)), nperseg=256)[1][:, :N]


def filtered(x, response):
    m = next_fast_len(N + 8192)
    return irfft(rfft(x, m) * response(np.fft.rfftfreq(m, 1 / SR)), m)[..., :N]


def colour(spectrum):
    return lambda hz: gain_from_db(along(spectrum, hz))


def modes(table):
    def response(f):
        total = 0
        for k, (centre, width, db) in enumerate(table):
            damping = 1j * f * width
            total = total + (-1) ** k * gain_from_db(db) * damping / (centre * centre - f * f + damping)
        return total
    return response


def stereo(pair, response, alike, pan):
    def split(hz):
        turn = np.arccos(np.clip(along(alike, hz), -1, 1)) / 2
        return response(hz) * [np.cos(turn), np.sin(turn)]

    mid, side = filtered(pair, split)
    out = np.array([mid + side, mid - side])
    out = filtered(out, lambda hz: gain_from_db(along(pan, hz) * [[0.5], [-0.5]]))
    return out / np.std(out.mean(axis=0))


def add(out, s, sound, pan_db):
    part = out[:, round(s * SR):][:, :sound.shape[-1]]
    part += (sound * gain_from_db([[pan_db / 2], [-pan_db / 2]]))[:, :part.shape[1]]


def scene():
    return strokes() + catches() + taps() + rustle() + ticks() + knocks() + bird() + town()


def top_cut(x):
    return signal.sosfilt(signal.butter(12, 15800, fs=SR, output="sos"), x)


def record(dry):
    mix = dry / (1 + np.abs(dry / 0.97) ** 8) ** (1 / 8)
    return top_cut(mix)


dry = scene()
out = record(dry)
generate_wav(out)
```